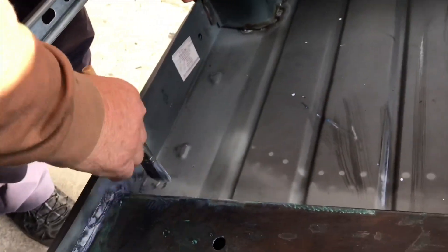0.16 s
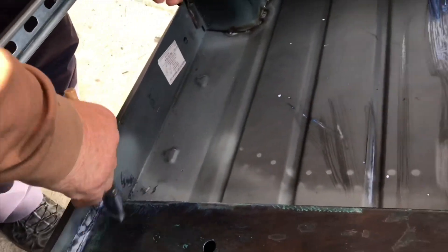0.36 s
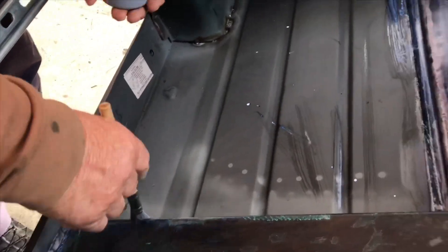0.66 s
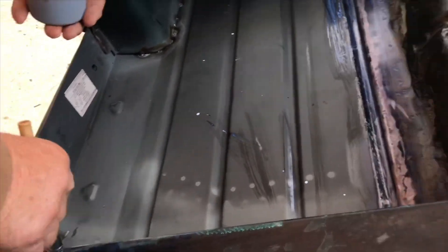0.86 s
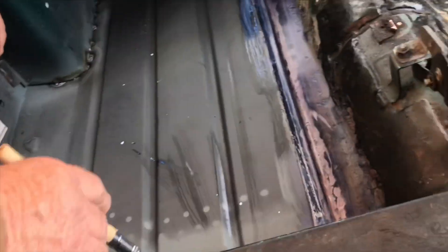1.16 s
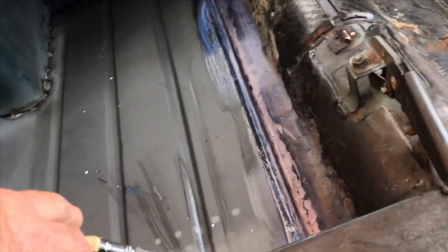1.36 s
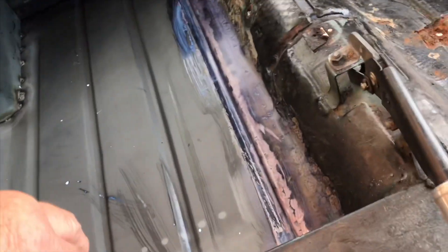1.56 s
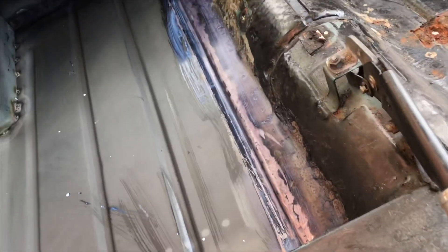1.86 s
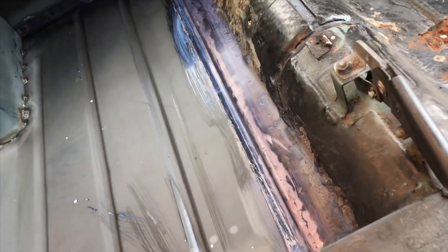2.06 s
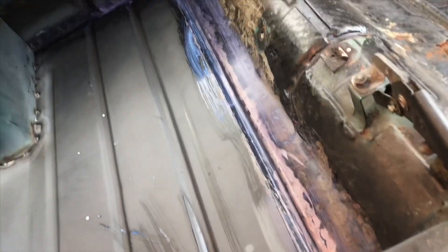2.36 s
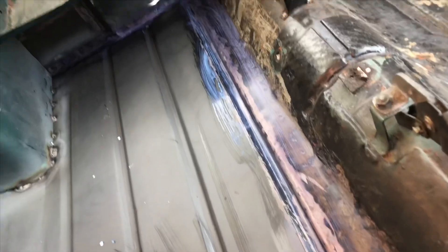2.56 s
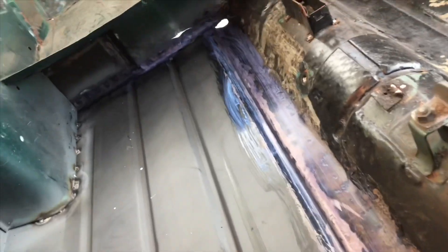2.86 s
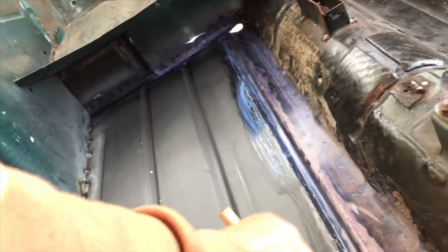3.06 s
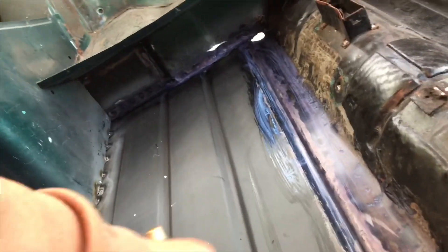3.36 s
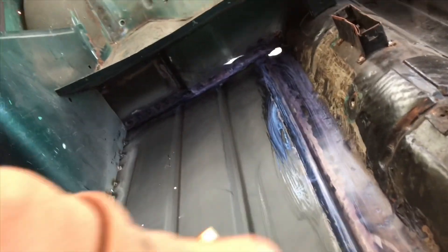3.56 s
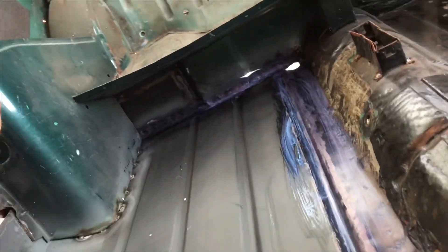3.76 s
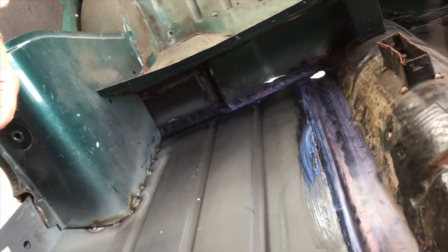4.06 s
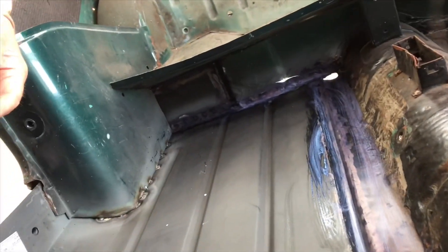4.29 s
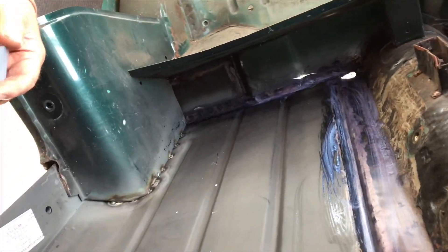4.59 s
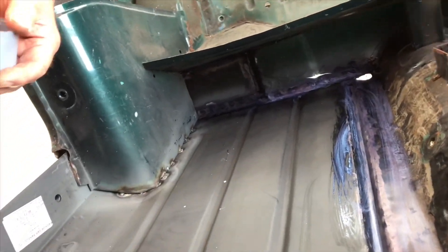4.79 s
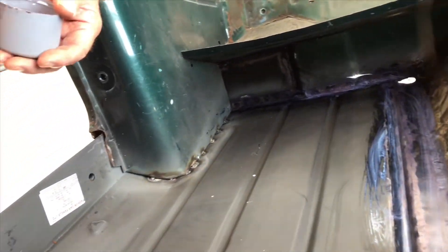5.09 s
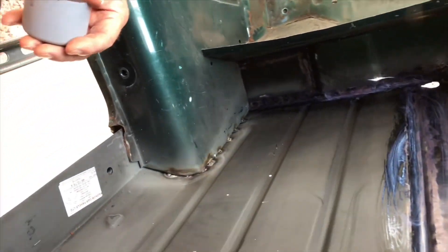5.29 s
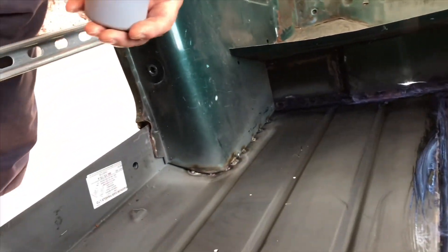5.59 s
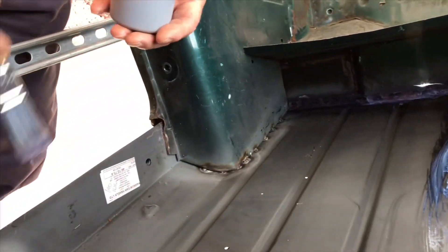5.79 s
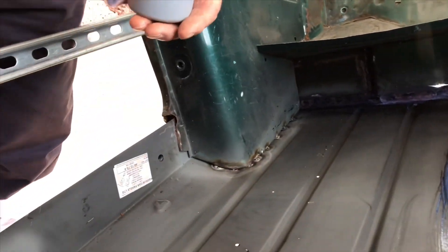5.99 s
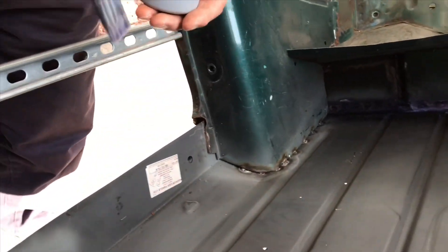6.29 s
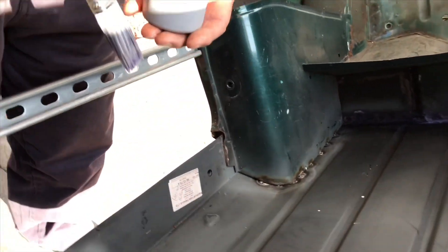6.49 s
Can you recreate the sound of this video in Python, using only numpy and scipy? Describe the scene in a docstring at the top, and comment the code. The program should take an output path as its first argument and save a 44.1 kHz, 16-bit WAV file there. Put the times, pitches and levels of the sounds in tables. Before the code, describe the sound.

A small brush scrubs wet, scratchy strokes across a ringing steel panel, with occasional knocks and squeaks over low air rumble in a garage.

```python
"""In a garage, close at the microphone: a small brush scrubs and dabs liquid along welded seams
of a steel floor pan. Bristles flick over the beads as shaped noise, and the sheet rings under them.
Now and then the brush knocks in short decaying bursts, or judders on one unsteady pitch.
Low noise rumbles as air on the microphone, over workshop noise and a faint whir of two noise bands.
One last hard scrape rasps and rings; after it the background sinks away."""
import sys
import numpy as np
from scipy import signal
from scipy.fft import rfft, irfft, next_fast_len
from scipy.io import wavfile
from scipy.ndimage import uniform_filter1d

SR = 44100
rng = np.random.default_rng(int(sys.argv[2]) if len(sys.argv) > 2 else 0)


def to_wav(sig):
    """Store sig (one row per channel, or 1-D mono) as 16-bit WAV at the path in sys.argv[1].

    Samples outside -1..1 are clipped; the rate is SR.
    """
    pcm = np.clip(np.atleast_2d(sig), -1, 1) * 32767
    pcm = np.round(pcm).astype(np.int16)
    wavfile.write(sys.argv[1], SR, pcm.T)  # frames by channels


N = 292806
T = np.arange(N) / SR
FFT_SIZE = 2 * next_fast_len(N // 2 + 1)
HZ = np.fft.rfftfreq(FFT_SIZE, 1 / SR)


def amp(db):
    """Decibels to gain."""
    return 10 ** (np.asarray(db) / 20)


def unit(x):
    """Scales to rms 1."""
    return x / np.sqrt(np.mean(x ** 2) + 1e-20)


def noise():
    """White noise over the whole scene."""
    return rng.standard_normal(N)


def over_time(points):
    """Joins (t/s, value) points by straight lines."""
    return np.interp(T, *np.transpose(points))


def spectrum(points):
    """Joins (f/Hz, level/dB) points on a logarithmic frequency axis."""
    hz, db = np.transpose(points)
    return np.interp(np.log(HZ + 1), np.log(hz + 1), db)


def humps(modes):
    """Resonance peaks in dB; each width is that at half the peak's dB."""
    return sum(db / (1 + (2 * (HZ - hz) / width) ** 2) for hz, width, db in modes)


def resonance(hz, half_width_hz):
    """One resonance in dB, 6 dB down at half_width_hz from its centre."""
    return -20 * np.log10(1 + ((HZ - hz) / half_width_hz) ** 2)


def colour(x, db):
    """Filters by a dB spectrum, to rms 1."""
    return unit(irfft(rfft(x, FFT_SIZE) * amp(db), FFT_SIZE)[:N])


def below(x, hz):
    """The part of a sound under a frequency."""
    return irfft(rfft(x, FFT_SIZE) / (1 + (HZ / hz) ** 6), FFT_SIZE)[:N]


def wander(rate_hz):
    """Slow random curve of rms 1, with two chance points per cycle of rate_hz."""
    knots = np.arange(0, N / SR + 1, .5 / rate_hz)
    return unit(np.interp(T, knots, rng.standard_normal(len(knots))))


def swell(t, half):
    """A smooth rise to 1 at t = 0, and back."""
    return np.cos(np.pi / 2 * np.clip(t / half, -1, 1)) ** 2


def flow(points):
    """Low turbulence, evened out to about rms 1 throughout."""
    x = colour(noise(), spectrum(points))
    power = uniform_filter1d(uniform_filter1d(x ** 2, size=8000), size=4000)
    return x / np.sqrt(power)


def flicks(per_s, spread_db, hiss):
    """Bristles snap free at random, a few of them hard, over a smooth rub."""
    size = amp(spread_db * np.minimum(rng.exponential(1, N), 4))
    snaps = size * rng.choice([-1., 1.], N) * (rng.random(N) < per_s / SR)
    return unit(snaps) + hiss * noise()


# Draught at the microphone: t/s, slow surge level/dB, buffeting level/dB
DRAUGHT_LEVELS = [(0, -27.5, -48), (.85, -23.5, -52), (1.15, -24.5, -53.5), (1.7, -23, -50.5),
                  (2.3, -22, -52.5), (2.75, -17.5, -48.5), (3.6, -21.5, -49.5), (4.4, -21.5, -51.5),
                  (5.5, -26, -52), (6.2, -28.5, -56)]
# Spectrum of the slow surge: f/Hz, relative level/dB per Hz
RUMBLE_SPECTRUM = [(4, -3.5), (9, 14), (15, 0.5), (22, -11.5), (30, -8), (42, -24), (60, -29), (90, -46.5),
                   (200, -80.5)]
# Spectrum of the quicker buffeting: f/Hz, relative level/dB per Hz
BUFFET_SPECTRUM = [(35, -38.5), (55, 0.5), (78, -2), (100, -7), (130, -15), (200, -24.5), (400, -72.5)]
GUST_DB, GUST_HZ = 1.0, 5.1  # rms unevenness and its rate


def draught():
    """Air on the microphone: low turbulence in a slow surge and a buffeting band, both gusting."""
    s, surge_db, buffet_db = np.transpose(DRAUGHT_LEVELS)
    surge = amp(np.interp(T, s, surge_db) + GUST_DB * wander(GUST_HZ))
    buffet = amp(np.interp(T, s, buffet_db) + GUST_DB * wander(GUST_HZ))
    return surge * flow(RUMBLE_SPECTRUM) + buffet * flow(BUFFET_SPECTRUM)


# Noise of the workshop: t/s, level/dB
WORKSHOP_LEVELS = [(0, -60.5), (1.2, -64.5), (1.7, -59.5), (2.75, -59.5), (4, -68.5), (5.2, -64),
                   (5.95, -62.5), (6.2, -69.5)]
# Its dull spectrum: f/Hz, relative level/dB per Hz
WORKSHOP_SPECTRUM = [(60, -11), (150, -7.5), (220, 1), (290, 5.5), (350, -3.5), (550, -2.5), (1000, -7.5),
                     (1400, -10), (1800, -14.5), (3800, -17.5), (4700, -25), (8000, -32), (15000, -50)]


def workshop():
    """The garage behind the brush: steady coloured noise of slowly changing level."""
    return amp(over_time(WORKSHOP_LEVELS)) * colour(noise(), spectrum(WORKSHOP_SPECTRUM))


# Swells of the whir: middle t/s, half length t/s, level/dB
WHIR_SWELLS = [(1.877, 0.58, -64), (4.3, 0.93, -79), (5.72, 0.42, -63.5)]
WHIR_REST_DB = -79.5  # between swells


def whir():
    """A faint hollow whir: two neighbouring resonances of noise swell and fade together."""
    level = amp(WHIR_REST_DB) + sum(amp(db) * swell(T - s, half) for s, half, db in WHIR_SWELLS)
    broad = colour(noise(), resonance(hz=1346, half_width_hz=162))
    narrow = colour(noise(), resonance(hz=1425, half_width_hz=50))
    return level * unit(0.66 * broad + narrow)


HUSH_S, HUSH_FALL_S, HUSH_DB = 6.2, .13, -22  # start, fall time and final change


def background():
    """Draught, workshop and whir, which sink away together at the end."""
    hush = amp(HUSH_DB * np.clip((T - HUSH_S) / HUSH_FALL_S, 0, 1))
    return hush * (draught() + workshop() + whir())


def cab(x, t60=0.16, tail_db=-11):
    """The steel walls around the pan return a short tail of decaying noise, dulled by a low-pass."""
    t = T[:SR // 2]
    tail = rng.standard_normal(len(t)) * amp(-60 * t / t60) * (t > .003)
    tail = tail / np.linalg.norm(tail)
    dull = signal.butter(2, 4200, fs=SR, output="sos")
    tail = signal.sosfilt(dull, tail)
    return x + amp(tail_db) * signal.oaconvolve(x, tail)[:N]  # tail_db sets it before the low-pass loss


# Faint crackles of the wet tuft: middle t/s, half length t/s, level/dB
CRACKLE_SWELLS = [(5.773, .04, -76), (6.188, 0.086, -76.5)]


def crackles():
    """Wet bristles part in tiny high ticks, random snaps through one broad treble resonance."""
    drive = flicks(per_s=420, spread_db=4.0, hiss=0.33)
    ticks = colour(drive, resonance(hz=7300, half_width_hz=1500))
    return ticks * sum(amp(db) * swell(T - s, half) for s, half, db in CRACKLE_SWELLS)


# Rasp of the last scrape: f/Hz, relative level/dB per Hz
RASP_SPECTRUM = [(120, 3.5), (220, 1), (700, -2.5), (1500, -5), (3300, 0), (4200, -11), (4800, -15.5),
                 (8000, -20.5), (11000, -30.5), (15000, -49.5)]
# Steel ringing in that scrape: f/Hz, width f/Hz, peak level/dB
SCRAPE_MODES = [(880, 60, 12.5), (1180, 71, 11), (1330, 100, 16.5), (1700, 78, 16), (1894, 78, 15),
                (2120, 80, 12.5), (2430, 120, 2), (2460, 50, 10.5), (2760, 50, 6.5), (3250, 120, 4),
                (4050, 60, 10.5)]
SCRAPE_S, SCRAPE_DB = 6.036, -37.5
SCRAPE_ATTACK_S, SCRAPE_HOLD_S, SCRAPE_T60 = 0.012, 0.028, 0.09  # the hold includes the attack


def scrape():
    """One hard rasp over an edge bites, holds and dies away, coloured by the ringing steel."""
    age = T - SCRAPE_S
    bite = np.clip(age / SCRAPE_ATTACK_S, 0, 1)
    decay_db = -60 * np.maximum(age - SCRAPE_HOLD_S, 0) / SCRAPE_T60
    rasp = flicks(per_s=2200, spread_db=3.0, hiss=0.99)
    ringing = colour(rasp, spectrum(RASP_SPECTRUM) + humps(SCRAPE_MODES))
    return bite * amp(SCRAPE_DB + decay_db) * ringing


# Stick and slip, low judder to squeak: middle t/s, half length t/s, f/Hz, rms pitch scatter f/Hz, level/dB
STICK_SLIPS = [(0.101, 0.021, 2820, 220, -51), (0.305, 0.043, 3720, 120, -47),
               (0.352, 0.099, 293.4, 28, -55.5), (0.624, 0.016, 3830, 43, -48.5),
               (2.607, 0.074, 293, 10.2, -46), (2.606, 0.047, 447, 17, -51), (2.904, 0.066, 567, 38, -47.5),
               (2.927, 0.08, 429, 45, -48.5), (3.294, 0.024, 2730, 63, -49), (3.831, 0.11, 2010, 43, -50.5),
               (3.929, 0.035, 1690, 61, -59), (3.831, 0.024, 3250, 330, -47), (4.07, 0.09, 1540, 67, -55.5),
               (4.781, 0.059, 601, 76, -54), (4.984, 0.076, 564, 50, -53), (5.29, 0.022, 1290, 22, -44),
               (5.291, 0.035, 1485, 38, -49), (5.886, 0.034, 273.5, 38, -56),
               (5.889, 0.034, 1320, 7.2, -57.5), (5.996, 0.045, 561, 32, -54.5)]


def judders(rough=0.57):
    """Stick and slip swells and fades on one tone of unsteady pitch and strength."""
    out = np.zeros(N)
    for s, half, hz, scatter_hz, db in STICK_SLIPS:
        near = abs(T - s) < half
        smooth = signal.butter(2, min(2 * scatter_hz, 4000), fs=SR, output="sos")
        chance = signal.sosfilt(smooth, rng.standard_normal((2, SR)))[:, -near.sum():]
        drift, grip = unit(chance[0]), unit(chance[1])
        tone = np.sin(2 * np.pi * np.cumsum(hz + scatter_hz * drift) / SR)
        out[near] += amp(db) * swell(T[near] - s, half) * unit(tone * (1 + rough * grip))
    return out


# Brush against a weld bead: t/s, level/dB of crack and burst alike, burst's 60 dB decay t/s
BEAD_KNOCKS = [(0.02, -59, 0.04), (0.269, -44, 0.1), (0.523, -59, .06), (1.154, -50, 0.018),
               (1.468, -94, .06), (2.334, -56, 0.12), (3.454, -38, 0.036), (3.623, -48, .04),
               (4.595, -40, 0.034), (5.269, -46.5, 0.05), (6.061, -49, 0.013)]
# Resonances of the floor pan, heard in knocks and scrubbing: f/Hz, width f/Hz, peak level/dB
PAN_MODES = [(284, 26, 9), (514, 89, 2.5), (706, 38, 4.5), (802, 22, 7.5), (904, 90, 4), (1228, 15, 2),
             (1583, 60, 4.5), (1890, 18, 4), (1910, 12, 6.5), (2063, 79, 4), (2290, 70, 2), (2870, 110, 1),
             (3257, 91, 5), (3265, 80, -0.5), (3500, 42, 5), (3740, 240, 3), (4780, 95, 4.5)]


def knocks(crack_t60=0.0032):
    """Each knock is a sharp crack and a short burst that dies in the damped pan."""
    force = np.zeros(N)
    for s, db, t60 in BEAD_KNOCKS:
        hit = (T >= s) & (T < s + 2 * t60)
        age = T[hit] - s
        burst = amp(db - 60 * age / t60)
        crack = amp(db - 60 * age / crack_t60)
        force[hit] += burst + crack
    # f/Hz, relative level/dB per Hz
    body = [(100, 14), (300, 1), (800, 3.5), (1500, 5.5), (3800, -3.0), (4800, -16), (8000, -11), (15000, -34.5)]
    return force * colour(noise(), spectrum(body) + humps(PAN_MODES))


# Strokes of the brush: start t/s, speeding up t/s, slowing down t/s, tips level/dB, sheet level/dB,
# lift of the tips' treble against their lower part/dB
BRUSH_STROKES = [ (0.015, 0.046, 0.066, -50.5, -55.5, 3.5), (0.1, 0.045, .06, -68.5, -71, 1),
                 (0.18, 0.02, 0.022, -64, -79, -1), (0.267, 0.039, .055, -45, -51, 6),
                 (0.31, 0.047, 0.2, -64.5, -67.5, 3.5), (0.52, 0.018, 0.058, -59.5, -53.5, 1.5),
                 (0.586, 0.049, 0.053, -48, -56.5, 2.5), (0.635, .045, 0.11, -56, -56, 0),
                 (0.789, 0.055, 0.057, -47, -52, 1.5), (0.99, 0.12, .05, -57, -78, 0.5),
                 (1.065, 0.064, 0.11, -48.5, -54.5, -1), (1.19, 0.14, 0.1, -61.5, -64.5, 0.5),
                 (1.463, 0.026, 0.03, -59, -59.5, 1), (1.513, 0.084, 0.11, -56, -57, -1),
                 (1.712, 0.08, 0.14, -55, -53.5, 2), (1.86, 0.11, 0.067, -52, -52, -1.5),
                 (1.96, 0.073, 0.11, -57, -51.5, 0.5), (2.04, 0.12, 0.12, -54.5, -58.5, 3.5),
                 (2.18, 0.058, 0.043, -60, -63, 1), (2.352, 0.062, 0.15, -54.5, -58, 2),
                 (2.516, .055, 0.078, -51.5, -51, 3), (2.56, 0.11, 0.5, -69, -67, -5),
                 (2.819, .1, .12, -47, -51.5, 4), (2.975, 0.12, 0.086, -50.5, -58.5, 2),
                 (3.1, 0.026, 0.085, -54.5, -59.5, 4.5), (3.192, 0.08, 0.042, -50.5, -56, 4),
                 (3.26, 0.029, 0.08, -45.5, -49.5, 0.5), (3.396, 0.054, 0.069, -52, -54.5, 1),
                 (3.47, 0.056, 0.083, -61.5, -63, 0), (3.565, .1, .07, -52, -56, 2),
                 (3.681, 0.035, 0.06, -48.5, -49.5, -0.5), (3.72, 0.098, 0.11, -47.5, -53, 1.5),
                 (3.86, 0.039, 0.22, -56.5, -62, 1.5), (4.035, 0.068, 0.06, -51.5, -51.5, -2.5),
                 (4.139, 0.12, 0.066, -50.5, -50, 1), (4.305, 0.067, 0.078, -55, -51.5, -1),
                 (4.424, 0.068, 0.069, -50, -51, 2), (4.5, 0.065, 0.075, -51.5, -55, 2),
                 (4.653, 0.076, .13, -48, -52.5, 3), (4.882, 0.062, 0.11, -49.5, -53.5, 2),
                 (5.03, 0.11, 0.094, -50.5, -58.5, 2.5), (5.262, 0.035, 0.03, -48.5, -56.5, -4),
                 (5.305, 0.044, 0.071, -53.5, -51.5, 1.5), (5.405, 0.06, 0.073, -54.5, -62.5, 5),
                 (5.45, 0.082, 0.083, -52, -54, 0), (5.855, 0.031, 0.096, -69.5, -68, -11.5),
                 (5.919, 0.063, 0.05, -60.5, -57.5, -3), ]
TIPS_POWER, SHEET_POWER = 1.46, 0.65  # exponents of gain against stroke speed
DRAG_DB = -81  # between strokes the tips still drag lightly on the steel


def strokes():
    """Each stroke speeds up and slows down; returns the gains of tips and sheet, and the treble lift."""
    touching = 1. * (T > BRUSH_STROKES[0][0]) * (T < BRUSH_STROKES[-1][0])
    touching = uniform_filter1d(touching, size=300)
    tips_power = touching * amp(DRAG_DB) ** 2 + 1e-14
    sheet_power, weighted_lift = np.zeros(N), np.zeros(N)
    for start, rise, fall, tips_db, sheet_db, lift_db in BRUSH_STROKES:
        on = (T > start) & (T < start + rise + fall)
        ramp = np.interp(T[on] - start, [0, rise, rise + fall], [0, 1, 0])
        speed = np.sin(np.pi / 2 * ramp)
        hiss_power = (amp(tips_db) * speed ** TIPS_POWER) ** 2
        tips_power[on] += hiss_power
        weighted_lift[on] += hiss_power * lift_db  # overlapping strokes count by their power
        sheet_power[on] += (amp(sheet_db) * speed ** SHEET_POWER) ** 2
    return np.sqrt(tips_power), np.sqrt(sheet_power), weighted_lift / tips_power


def roam(x, patchy_db=3.0):
    """As the brush travels, different modes of the sheet answer; in the treble they merge to even hiss."""
    hz, _, z = signal.stft(x, SR, nperseg=1024, noverlap=768)
    patches = uniform_filter1d(rng.standard_normal(z.shape), size=3, axis=0)  # across frequency
    patches = uniform_filter1d(patches, size=14, axis=1)  # across time
    depth_db = patchy_db / (1 + (hz[:, None] / 6000) ** 2)
    _, patchy = signal.istft(z * amp(depth_db * unit(patches)), nperseg=1024, noverlap=768)
    return unit(patchy[:N])


# Bristle tips on the steel: f/Hz, relative level/dB per Hz
TIPS_SPECTRUM = [(900, -63), (1700, -12), (2500, 0.5), (3300, 0), (4000, 0.5), (4600, -7.5), (5600, -7),
                 (7400, -6), (9000, -8), (11000, -14.5), (13000, -19), (15700, -23.5)]


def bristle_tips(drive, lift_db):
    """The tips hiss through the pan's resonances; bright strokes tilt power from below 4600 Hz to above."""
    hiss = colour(drive, spectrum(TIPS_SPECTRUM) + humps(PAN_MODES))
    swish = below(hiss, hz=4600)
    fizz = hiss - swish
    tilt = amp(np.clip(lift_db, -12, 12) / 2)  # half the lift each way
    return swish / tilt + fizz * tilt


# Sheet under the brush: f/Hz, relative level/dB per Hz
SHEET_SPECTRUM = [(120, 3), (280, -0.5), (520, 7), (750, 4), (1050, 5.5), (1450, 10.5), (1900, -2),
                  (2600, -18.5), (4200, -40), (7000, -59.5)]
# How freely the sheet flexes, stiff in the first corner: t/s, level/dB on its low modes
SHEET_FLEX = [(0, -6), (1.2, -0.5), (1.7, -3.5), (3, 4), (3.7, 2), (4.3, 0.5), (5.5, 3), (6, 6)]


def sheet_ring(drive):
    """The sheet rings under the bristles, its modes below 1030 Hz following how freely it flexes."""
    ring = colour(drive, spectrum(SHEET_SPECTRUM) + humps(PAN_MODES))
    flex = amp(over_time(SHEET_FLEX))
    return ring + (flex - 1) * below(ring, hz=1030)


def brush(grip_db=1.0):
    """Scrubbing drives the hiss of the tips and, by how hard the brush is pushed, the sheet."""
    tips_gain, sheet_gain, lift_db = strokes()
    grip = amp(grip_db * wander(rate_hz=36))  # the tuft catches and slips
    drive = roam(flicks(per_s=4000, spread_db=2.5, hiss=0.61))
    return grip * (tips_gain * bristle_tips(drive, lift_db) + sheet_gain * sheet_ring(drive))


def scene():
    """The brush close by in the steel cab, and the air and garage around it."""
    steel = crackles() + scrape() + judders() + knocks() + brush()
    return (background() + cab(steel))[None]


def record(dry):
    """The microphone's band limit: a steep low-pass at 15750 Hz."""
    low_pass = signal.firwin(511, 15750, window=("kaiser", 9), fs=SR)
    return signal.oaconvolve(dry, low_pass[None], "same")


dry = scene()
out = record(dry)
to_wav(out)
```